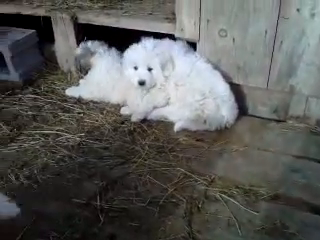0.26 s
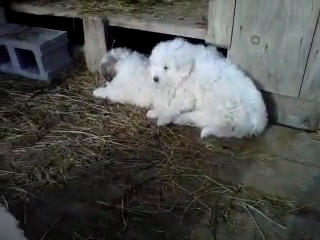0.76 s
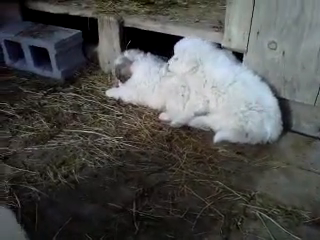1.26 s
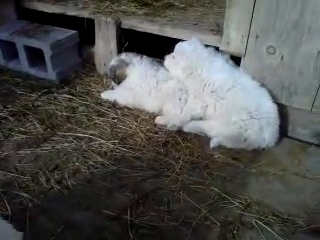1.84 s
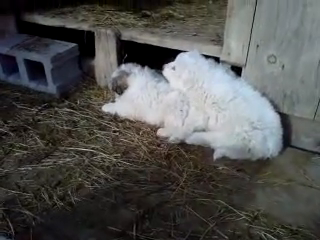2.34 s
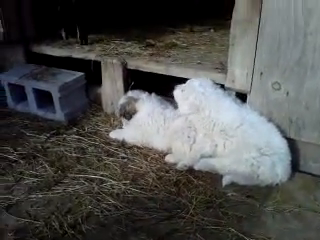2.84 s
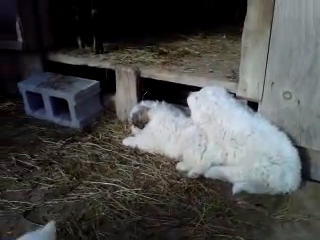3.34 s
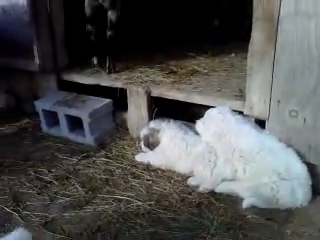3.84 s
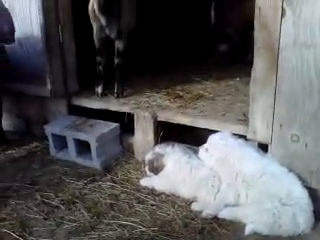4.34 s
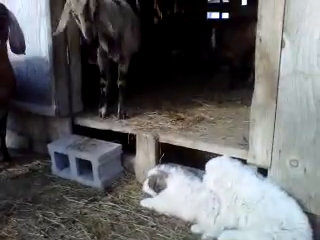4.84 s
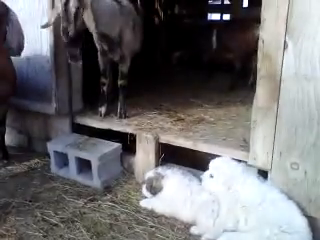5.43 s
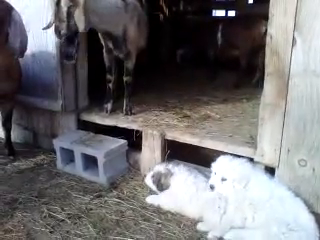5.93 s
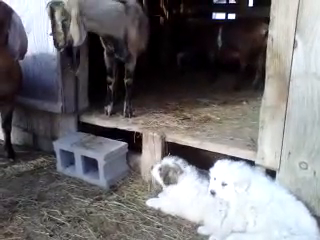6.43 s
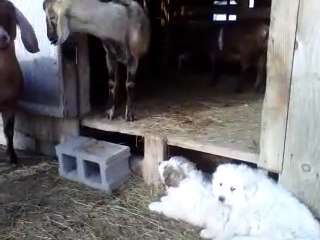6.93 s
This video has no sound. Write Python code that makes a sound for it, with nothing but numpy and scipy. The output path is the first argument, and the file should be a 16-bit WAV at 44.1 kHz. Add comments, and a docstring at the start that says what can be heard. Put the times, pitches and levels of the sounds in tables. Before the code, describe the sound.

A clear, whistling rooster crow opens the scene and holds for about two seconds. Goats shuffle in straw on wooden boards as a second bird gives a shorter, lower, raspy crow with more barn echo. After a pause come a sharp click, hoof knocks, a faint distant answering call and two firm close bumps. A hand-held microphone adds steady soft hiss and dull handling thuds.

```python
"""At the doorway of a wooden barn, with a hissing hand-held camera that a few soft bumps and clicks reach.
A rooster crows first, clear and whistling; goats then stir the straw and knock on the floor boards.
A second rooster crows, lower and hoarse, and later a faint call answers from afar, before two firm bumps.
The birds are buzzing partials with rattle and breath, coloured by throat and barn; hooves, straw and
bumps are bursts, snaps and strikes that ring damped resonances; the hiss is coloured noise."""
import sys
import numpy as np
from scipy import signal
from scipy.fft import rfft, irfft
from scipy.io import wavfile
from scipy.ndimage import uniform_filter1d

SR = 44100
rng = np.random.default_rng(int(sys.argv[2]) if len(sys.argv) > 2 else 0)


def waveform_to_disk(signal):
    """Save audio, clipped to [-1, 1], as 16-bit WAV at the path in sys.argv[1]."""
    frames = np.transpose(np.atleast_2d(signal))
    scaled = np.clip(frames, -1, 1) * 32767
    samples = np.round(scaled).astype(np.int16)
    wavfile.write(sys.argv[1], SR, samples)


N = 316373
TIME = np.arange(N) / SR

# Still air and microphone hiss, a spectrum: f/Hz, relative level/dB
AIR_SPECTRUM = [(12, -25), (20, -10.5), (30, 3), (70, -0.5), (157, -2.5), (210, -7.5), (296, -9),
                (618, -12.5), (682, -11), (734, -15.5), (938, -15), (1090, -15), (7000, -22.5),
                (9100, -74.5), (15400, -120)]
# First crow, climbing to a pure whistle between two rough breaks: t/s, pitch f/Hz, second partial level/dB,
# roughness 0-1, then against the second partial: first level/dB, third level/dB, all higher level/dB
CLEAR_CROW = [(0, 512.4, -43.5, 0.3, -18.5, -27, -28), (0.095, 515.5, -50.5, 0.54, -20, -19, -25),
              (0.125, 517.3, -41.5, 0.19, -28, -28, -35), (0.16, 518.3, -46.5, 0.3, -28, -29, -23.5),
              (0.24, 532.6, -47, 0.38, -19, -11.5, -21), (0.32, 512.5, -43, 0.43, -20.5, -28, -24),
              (0.37, 510.6, -38.5, 0.1, -26.5, -18, -25.5), (0.46, 523.9, -38, 0.2, -33.5, -22, -19.5),
              (0.5, 499.1, -39, 0.19, -25, -25, -19), (0.54, 475.3, -42.5, 0.31, -13, -13, -18.5),
              (0.58, 482.3, -42.5, 0.25, -4, -18, -12.5), (0.64, 496.6, -37, 0.29, -21.5, -18, -20),
              (0.71, 496.2, -41, 0.22, -20, -16.5, -16.5), (0.77, 497.4, -35, 0.18, -23.5, -17, -21),
              (0.81, 500.7, -40, 0.23, -20, -13, -16.5), (0.91, 501.9, -34, 0.11, -25.5, -19, -19),
              (1.0, 515.7, -40.5, 0.31, -19.5, -13, -12.5), (1.08, 521.8, -41, 0.23, -21, -11.5, -15.5),
              (1.12, 529.1, -38, 0.17, -25, -13.5, -16.5), (1.16, 521, -40.5, 0.24, -22, -10, -11.5),
              (1.21, 544.8, -35.5, 0.15, -23.5, -12.5, -18), (1.26, 550, -33.5, 0.02, -33, -17.5, -21),
              (1.37, 551.4, -31.5, 0.03, -33, -25, -30), (1.4, 534.8, -43, 0.19, -15, -16.5, -11.5),
              (1.44, 524.6, -31, 0.2, -29, -22, -23), (1.48, 479.3, -39.5, 0.38, -11, -16, -14),
              (1.57, 499.6, -38, 0.25, -22, -17, -12.5), (1.66, 517.2, -34, 0.24, -23, -20, -20.5),
              (1.71, 520.3, -43.5, 0.33, -9.5, -13.5, -13.5), (1.77, 497.7, -33.5, 0.24, -21, -28.5, -21),
              (1.89, 502.6, -35, 0.16, -20, -18.5, -17.5), (2.01, 498, -33, 0.17, -20, -25, -17),
              (2.08, 491.8, -54.5, 0.3, -3.5, -2, -5.5), (2.16, 501.6, -63.5, 0.09, -21, -12, -16)]
# Alternation of strong and weak cycles, most at the opening, again at the top: t/s, depth level/dB
CLEAR_HALVING = [(0, -13), (0.27, -3), (0.45, -31.5), (1.18, -35.5), (1.26, -24.5), (1.36, -24),
                 (1.45, -26)]
# Throat and beak of the first bird, before its partials are balanced: f/Hz, gain level/dB
CLEAR_THROAT = [(300, -29), (490, -28.5), (600, -32), (830, -10), (1030, -0.5), (1250, -11.5),
                (1560, -24.5), (2050, -19), (2220, -28.5), (2500, -22), (2720, -30), (3000, -29.5),
                (3330, -34), (3700, -51), (4200, -41), (7000, -65.5)]
# Soft bumps on the camera: t/s, peak level/dB, resonance f/Hz, ring t60 t/s (shorter if it rubs), rubbing 0-1
BUMPS = [(0.18, -40, 182, 0.32, 1), (0.342, -42, 319, 0.061, 1), (0.681, -44.5, 197, 0.11, 0.1),
         (0.703, -38.5, 205, 0.2, 0.3), (1.46, -51.5, 50.4, 0.26, 0.7), (1.962, -38, 141.3, 0.28, 0.5),
         (1.986, -41, 41.2, 0.17, 0.7), (3.052, -34, 257, 0.15, 0.4), (3.088, -38, 180, 0.22, 0.9),
         (3.372, -48.5, 178.5, 0.58, 0.32), (3.58, -51.5, 168, 0.3, 0.36), (5.144, -50, 184, 0.28, .8),
         (5.555, -54.5, 145, 0.18, 0.01), (6.688, -47, 143, 0.039, 0.01), (6.778, -23.5, 170, 0.046, 0.12),
         (6.7897, -24.5, 202, 0.11, 0.1), (7.079, -54, 160, .2, 0.4)]
# Airy hiss on the forced parts of the crows: t/s, length t/s, rms level/dB
PUFFS = [(1.1, 0.23, -70), (1.43, 0.1, -71), (1.56, 0.436, -65), (2.5, 0.23, -70.5), (3.37, 0.087, -73.5)]
# Spells in which the animals stir the straw: t/s, length t/s, rms level/dB
STIRS = [(2.306, 1.55, -75), (4.656, 1.07, -74.5), (6.301, 1.2, -77.5)]
# Broad modes of the floor boards: f/Hz, width f/Hz, level/dB
BOARD_MODES = [(272, 170, 4.5), (640, 56, 0), (860, 510, -1.5), (1760, 740, 3), (2340, 650, 8.5)]
# Firmer hoof falls: t/s, peak level/dB before the echo, treble against bass level/dB, plank note f/Hz,
# plank against scuff level/dB, landing time t/s
HOOF_FALLS = [(2.200, -49.5, -7.5, 874, 0, 0.00087), (2.272, -47.5, -8, 395, -3.5, 0.0017),
              (4.695, -50.5, -8.5, 800, -10, .012), (4.958, -39, -4, 834, -6, 0.0011),
              (5.003, -39.5, -8, 577, 1, 0.0014), (5.328, -48.5, 3, 864, 1.5, 0.00155),
              (5.396, -51, -4, 350, 15, .008), (5.417, -49, -6, 317, 2, 0.0071),
              (5.555, -48.5, 1, 860, 9, 0.012), (6.19, -51, -15, 198.6, 10, 0.0022),
              (6.354, -51, -3, 610, 10, 0.012), (6.436, -54.5, -10, 670, -6, 0.0013),
              (6.486, -47, -8, 946, 1, 0.022), (6.685, -44.5, -6, 434, -9, .005),
              (7.0, -53, -9, 914, -14, .004)]
# Thin scrapes over the straw: t/s, length t/s, rms level/dB
SCRAPES = [(2.39, .17, -68.5), (5.42, .015, -60)]
# Second crow, an arch that rasps at both ends: columns as for CLEAR_CROW
HOARSE_CROW = [(2.44, 398.1, -67, 0.84, -8, -8, 3), (2.52, 424.5, -54, 0.86, -3.5, -11, -11),
               (2.61, 428.3, -47.5, 0.77, -10, -22, -7), (2.68, 455.4, -47.5, 1, -9, -9, -12.5),
               (2.76, 456.3, -45, 0.39, -10, -14.5, -7.5), (2.84, 463, -44.5, 0.39, -8.5, -4, -7.5),
               (2.92, 466.4, -47, 0.13, -8, -9.5, -12), (2.99, 472, -54, 0.19, -9.5, -1.5, 3),
               (3.1, 483.8, -47, 0.16, -7.5, -8, -4), (3.135, 484, -44.5, 0.65, -5, -8, -11),
               (3.2, 489.7, -46.5, 0.52, -10.5, -4.5, -9), (3.31, 480.7, -51.5, 0.56, -2, 3.5, -8),
               (3.4, 489, -53, 0.72, -7.5, 1.5, -10), (3.49, 495, -48.5, 0.95, -7, -9, -21),
               (3.58, 438.3, -51.5, 0.55, -12.5, -6.5, -6), (3.66, 414.7, -62.5, 0.5, 1, -9, -17)]
# Its rattle, climbing through the long rasp and sinking at the end: t/s, multiple of the pitch
HOARSE_RATTLE = [(2.48, 1.9), (2.61, 2.0), (2.7, 2.25), (2.85, 2.25), (3.13, 2.45), (3.32, 2.75),
                 (3.42, 2.45), (3.5, 2.25), (3.62, 2.1)]
# Throat and beak of the second bird, used for the far call too: f/Hz, gain level/dB
HOARSE_THROAT = [(300, -19), (480, 4.5), (650, -5), (950, 9.5), (1400, -0.5), (1650, -4), (1880, -1.5),
                 (2200, -18.5), (2550, -27.5), (2880, -14), (3300, -22), (3800, -28), (4500, -43),
                 (7000, -43)]
# Sharp clicks close by: t/s, peak level/dB before the echo, resonance f/Hz, ring t60 t/s (shorter if it rubs),
# rubbing 0-1, hollow knock against click level/dB
CLICKS = [(2.594, -30, 2670, 0.0064, 0.14, -4), (4.7934, -28, 1620, 0.018, 0.19, -24),
          (4.811, -44, 1550, 0.008, 0.08, -18)]
# Faint answer from far off: columns as for CLEAR_CROW
FAR_CALL = [(5.74, 490, -65, 0.45, -12, -7, -20), (5.82, 466, -69.5, 0.44, -3, -24, -17),
            (6.02, 453, -72.5, 0.23, -7, 0, -2), (6.15, 472, -99, 0.4, -11, 2, -8),
            (6.27, 498, -64.5, 0.47, -19, -6, -19)]

AIR_DB = -64  # rms
BARN_T60_S = 0.34
QUAVER_HZ, GROWL_HZ = 55.11, 95.16  # fast shake of the pitch; beating of the rasp
CROW_ATTACK_S, CROW_RELEASE_S = 0.024, 0.046
CROW_TAIL_DB = -8.5  # a crow stops quickly and leaves a tail in the barn
SETTLE_S, SETTLE_DB = .048, -13.5  # the hand settles after a bump, more so when it rubs
CASE_HZ, CASE_T60_S = 920, .016  # hollow knock under a click
PUFF_FADE_S, PUFF_FLICKER_DB = 0.033, 2
STIR_FADE_S = 0.18
SCUFF_T60_S, PLANK_T60_S = 0.083, 0.037
STALK_HZ = 250  # highest rate at which stalks give way in a scuff
# the whole floor gives under a hoof, a little late; level against the scuff
THUD_HZ, THUD_DB, THUD_T60_S, THUD_LAG_S = 216.7, -14.5, 0.12, 0.0122
# light steps: spacing, level over the straw, spread either way, treble against bass
SHUFFLE_S, SHUFFLE_DB, SHUFFLE_SPREAD_DB, SHUFFLE_TREBLE_DB = 0.13, 23.5, 3.5, -11
# their planks ring within an octave of this note; they land gently
SHUFFLE_PLANK_HZ, SHUFFLE_PLANK_DB, SHUFFLE_PRESS_S = 535, -12.5, 0.0041
SCRAPE_HZ, SCRAPE_WIDTH_HZ, SCRAPE_FADE_S = 2510, 390, 0.01
TOP_HZ = 7200  # upper limit of the camera's microphone


def undb(db):
    """Decibels to gain."""
    return 10 ** (np.asarray(db) / 20)


def unit(x):
    """Scale to an rms of 1."""
    return x / np.sqrt(np.mean(x ** 2))


def even(x):
    """Scale to a short-term rms of 1."""
    power = uniform_filter1d(uniform_filter1d(x ** 2, size=2200), size=2200)
    return x / np.sqrt(np.abs(power) + 1e-12)


def curves(table):
    """Each column of a table, joined by straight lines in time."""
    s, *columns = np.transpose(table)
    return [np.interp(TIME, s, c) for c in columns]


def spells(table, fade_s):
    """Gain that fades in, holds and fades out for each (t, length, level) row."""
    gain = np.zeros(N)
    for s, length, db in table:
        corners = [s - fade_s, s, s + length, s + length + fade_s]
        gain += undb(db) * np.interp(TIME, corners, [0, 1, 1, 0])
    return gain


def colour(x, points):
    """Filter by a spectrum of (f, level) points, joined over log frequency."""
    hz, db = np.transpose(points)
    bins = np.maximum(np.fft.rfftfreq(len(x), 1 / SR), 1)
    gain = undb(np.interp(np.log(bins), np.log(hz), db))
    return irfft(rfft(x) * gain, len(x))


def cut(x, hz, kind, order=2):
    """Low-pass, high-pass or band-pass."""
    return signal.sosfilt(signal.butter(order, hz, kind, fs=SR, output="sos"), x)


def resonate(x, hz, width_hz):
    """One resonance, gain 1 at its centre."""
    return signal.lfilter(*signal.iirpeak(hz, hz / width_hz, fs=SR), x)


def flutter(hz):
    """Random wavering up to the given rate, rms 1."""
    return unit(cut(rng.standard_normal(N), hz, "low"))


def wobble(hz, spread):
    """A loose oscillation whose rate wanders by the given share."""
    return np.cos(2 * np.pi * np.cumsum(hz * (1 + spread * flutter(24.8))) / SR)


def decay(t, t60):
    """Exponential dying away by 60 dB in t60 seconds."""
    return np.exp(-np.log(1000) * t / t60)


def burst(t60):
    """Half a second of dying noise with an energy of 1."""
    t = TIME[:SR // 2]
    x = rng.standard_normal(len(t)) * decay(t, t60)
    return x / np.linalg.norm(x)


def add(track, s, x):
    """Mix a sound into a track at time s."""
    i = int(s * SR)
    track[i:i + len(x)] += x[:N - i]


def barn(x, wet_db):
    """Direct sound plus the dense echoes of plank walls, which swallow the treble."""
    echoes = cut(burst(BARN_T60_S), 6400, "low", order=1)
    echoes = np.concatenate([np.zeros(int(.005 * SR)), echoes])
    wet = undb(wet_db) * signal.fftconvolve(x, echoes)[:N]
    return (x + wet) / np.hypot(1, undb(wet_db))


def still_air():
    """Steady hiss over a faint outdoor rumble: noise coloured by one spectrum."""
    return undb(AIR_DB) * unit(colour(rng.standard_normal(N), AIR_SPECTRUM))


def syrinx(hz, rough, rattle_times, tremble, quaver, pulsing, jitter, rattle_db, half_db, odd_db,
           shimmer=.55, breath_db=9.0, growl_db=6, collapse=.65):
    """The membranes buzz with uneven cycles and, when forced, rattle and let breath through."""
    rattle_hz = rattle_times * hz
    # the pitch trembles and quavers, and scatters from cycle to cycle when the voice rasps
    quavering = wobble(QUAVER_HZ, spread=0.102)
    shake = tremble * flutter(40.6) + quaver * quavering
    hz = hz * (1 + rough ** 0.637 * shake + jitter * rough * flutter(97))
    phase = 2 * np.pi * np.cumsum(hz) / SR
    # the membranes close almost twice a cycle, so the odd partials fade quickly
    buzz = sum(np.cos(k * phase) * undb(odd_db * (k - 2) ** 2 * (k % 2)) for k in np.arange(1, 9))
    # strong and weak cycles alternate, which puts faint lines between the partials
    buzz = buzz * (1 + undb(half_db) * np.cos(phase / 2) + shimmer * rough * flutter(67))
    # the level pulses in step with the quaver
    buzz = buzz * (1 + pulsing * np.sqrt(rough) * quavering)
    # the membranes also break into an irregular second oscillation
    wander = 1 + .08 * flutter(70) + 0.0209 * flutter(14)
    turn = 2 * np.pi * np.cumsum(rattle_hz * wander) / SR
    rattle = np.cos(turn) + 0.48 * np.cos(turn / 2)
    air = rng.standard_normal(N) * (1 + np.cos(phase) / 2)
    # at its roughest the tone gives way to a rasp that comes in coarse beats
    beats = unit(undb(growl_db * wobble(GROWL_HZ, spread=.3)))
    rasp = beats * (undb(breath_db) * air + undb(rattle_db) * rough * rattle)
    return buzz * (1 - collapse * rough ** 2) + rough * rasp


def rooster(table, throat, waver_db, fade_db, wet_db, **voicing):
    """Throat and beak pick out the syrinx's second partial; the barn answers."""
    hz, level_db, rough, first_db, third_db, upper_db = curves(table)
    rough = np.clip(rough, 0, 1)
    voice = barn(colour(syrinx(hz, rough, **voicing), throat), wet_db)
    # as the beak opens and closes, the other partials shift against the main ring
    first = even(cut(voice, 620, "low", order=8))
    ring = even(cut(voice, [680, 1280], "band", order=8))
    third = even(cut(voice, [1280, 1720], "band", order=8))
    upper = even(cut(voice, 1720, "high", order=8))

    def swell(db, rate_hz):
        """Random swell and fade, as echoes give an unsteady pitch; deeper where the voice is rough."""
        return db * np.sqrt(rough) * flutter(rate_hz)

    voice = undb(first_db) * first + undb(swell(waver_db, 22)) * ring
    voice += undb(third_db + swell(fade_db, 19)) * third
    voice += undb(upper_db + swell(fade_db, 25)) * upper
    start, end = table[0][0], table[-1][0]
    # a crow already under way at the start has no attack
    attack = np.clip((TIME - start) / CROW_ATTACK_S, 0, 1) if start > CROW_ATTACK_S else 1
    after = np.maximum(TIME - end, 0)
    tail = undb(CROW_TAIL_DB) * decay(after, BARN_T60_S)
    release = np.maximum(np.exp(-after / CROW_RELEASE_S), tail)
    return voice * attack * release * undb(level_db)


def clear_crow():
    """First bird: a whistling voice with more direct sound than echo."""
    return rooster(CLEAR_CROW, CLEAR_THROAT, waver_db=1.5, fade_db=4.2, wet_db=-2.5,
                   rattle_times=2.0, tremble=.034, quaver=.04, pulsing=0.59, jitter=0.0549,
                   rattle_db=2.0, half_db=curves(CLEAR_HALVING)[0], odd_db=-1.5)


def taps(table, dull):
    """Each touch is a push and some rubbing that ring one damped resonance of the camera."""
    out = np.zeros(N)
    for s, db, hz, t60, rub in table:
        force = rub * burst(t60)
        force[0] += (1 - rub) / np.sqrt(SR * t60) * 8
        # rubbing broadens the resonance
        ring = resonate(force, hz, np.log(1000) / (np.pi * t60) + rub * hz * 0.45)
        ring = cut(cut(ring, hz * dull, "low", order=4), 3000, "low", order=16)
        add(out, s, undb(db) * ring / np.abs(ring).max())
    return out


def handling(dull, click_dull, wet_db):
    """Bumps on the camera, each with a softer settling of the hand, and clicks with their hollow knock."""
    settling = [(s + SETTLE_S, db + SETTLE_DB + 20 * np.log10(abs(rub) + 1e-3), hz, t60, 1)
                for s, db, hz, t60, rub in BUMPS]
    sharp = [row[:-1] for row in CLICKS]
    hollow = [(s, db + knock_db, CASE_HZ, CASE_T60_S, 0) for s, db, *_, knock_db in CLICKS]
    bumps = taps(list(BUMPS) + settling, dull)
    clicks = taps(sharp, click_dull) - taps(hollow, click_dull)
    return bumps + barn(clicks, wet_db)


def airy_hiss():
    """A thin hiss flickers high above the forced parts of the crows: band-passed noise that flickers."""
    flicker = undb(PUFF_FLICKER_DB * flutter(QUAVER_HZ))
    hiss = cut(rng.standard_normal(N), [2500, 7000], "band") * flicker
    return unit(hiss) * spells(PUFFS, PUFF_FADE_S)


def boards(force):
    """The wooden floor answers a force with its few broad modes."""
    ring = sum(undb(db) * resonate(force, hz, width_hz) for hz, width_hz, db in BOARD_MODES)
    return cut(ring, 2790, "low", order=5)


def straw(per_second, spread_db):
    """Many tiny stalks crackle on the boards under shifting feet."""
    snaps = (rng.random(N) < per_second / SR) * rng.standard_normal(N)
    sizes = undb(spread_db * np.minimum(rng.exponential(size=N), 4))
    return unit(barn(boards(snaps * sizes), wet_db=3.5)) * spells(STIRS, STIR_FADE_S)


def hooves(table, grain_db, wet_db):
    """A hoof crushes straw as it lands: a grainy scuff, the note of its plank, then a thud of the floor."""
    out, t = np.zeros(N), TIME[:SR // 2]
    for s, db, treble_db, plank_hz, plank_db, press_s in table:
        def note(hz, t60, lag_s):
            """A dying sine that starts late and swells over the landing time."""
            age = np.maximum(t - lag_s, 0)
            return np.sin(2 * np.pi * hz * age) * decay(age, t60) * (1 - np.exp(-age / press_s))

        stalks = undb(grain_db * unit(cut(rng.standard_normal(len(t)), STALK_HZ, "low")))
        scuff = boards(burst(SCUFF_T60_S) * stalks * (1 - np.exp(-t / press_s)))
        treble = cut(scuff, 1440, "high", order=3)
        scuff = cut(scuff, 1400, "low") + undb(treble_db) * treble
        plank = undb(plank_db) * note(plank_hz, PLANK_T60_S, press_s)
        thud = undb(THUD_DB) * note(THUD_HZ, THUD_T60_S, THUD_LAG_S)
        knock = scuff / np.abs(scuff).max() + plank + thud
        add(out, s, undb(db) * knock / np.abs(knock).max())
    return barn(out, wet_db)


def shuffles():
    """Light steps at uneven moments while the animals stir, as rows of hoof falls."""
    rows = []
    for start, length, straw_db in STIRS:
        for k in range(int(length / SHUFFLE_S)):
            s = start + k * SHUFFLE_S
            late, size, plank = rng.random(3)
            if s + SHUFFLE_S < TIME[-1]:
                db = straw_db + SHUFFLE_DB + SHUFFLE_SPREAD_DB * (2 * size - 1)
                plank_hz = SHUFFLE_PLANK_HZ * 2 ** (2 * plank - 1)
                rows.append((s + SHUFFLE_S * late, db, SHUFFLE_TREBLE_DB,
                             plank_hz, SHUFFLE_PLANK_DB, SHUFFLE_PRESS_S))
    return rows


def scrapes():
    """Something drags over dry straw with a thin hiss: noise through one narrow resonance twice."""
    hiss = resonate(rng.standard_normal(N), SCRAPE_HZ, SCRAPE_WIDTH_HZ)
    hiss = resonate(hiss, SCRAPE_HZ, SCRAPE_WIDTH_HZ)
    return unit(hiss) * spells(SCRAPES, SCRAPE_FADE_S)


def hoarse_crow():
    """Second bird: a lower, rasping voice with more echo than direct sound."""
    return rooster(HOARSE_CROW, HOARSE_THROAT, waver_db=1.0, fade_db=2.0, wet_db=7.5,
                   rattle_times=curves(HOARSE_RATTLE)[0], tremble=0.035, quaver=0.012, pulsing=0.33,
                   jitter=0.02602, rattle_db=5.0, half_db=-38, odd_db=-0.5)


def far_call():
    """Distant bird: a faint, shaky voice, mostly echo, its cycles strongly alternating."""
    return rooster(FAR_CALL, HOARSE_THROAT, waver_db=1.5, fade_db=4.2, wet_db=8,
                   rattle_times=1.8, tremble=0.0683, quaver=.04, pulsing=0.43, jitter=0.0448,
                   rattle_db=12, half_db=0.0, odd_db=-15.0)


def scene():
    """The crows, the goats' feet and the handling noise, in one channel."""
    crows = clear_crow() + hoarse_crow() + far_call()
    camera = handling(dull=1.65, click_dull=1.64, wet_db=-14.5)
    background = still_air() + airy_hiss() + straw(per_second=330, spread_db=-0.5) + scrapes()
    goats = hooves(list(HOOF_FALLS) + shuffles(), grain_db=4, wet_db=-10.5)
    return (crows + camera + background + goats)[None]


def record(dry):
    """The small camera's microphone keeps nothing of the high treble: a steep low-pass."""
    return signal.sosfilt(signal.ellip(10, .2, 70, TOP_HZ, fs=SR, output="sos"), dry)


dry = scene()
out = record(dry)
waveform_to_disk(out)
```